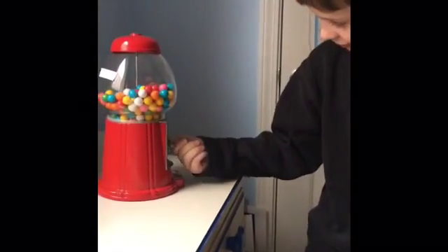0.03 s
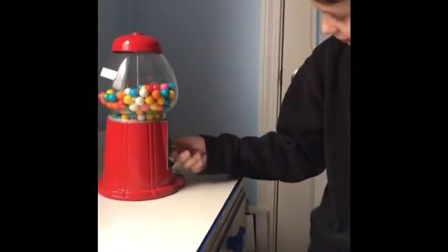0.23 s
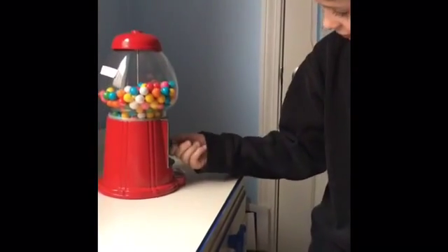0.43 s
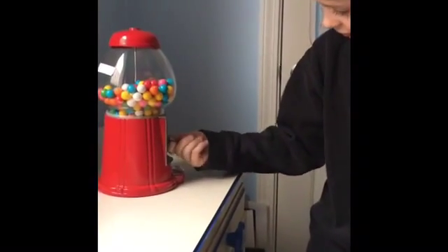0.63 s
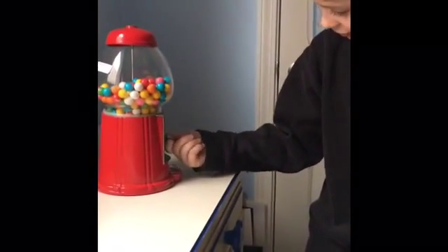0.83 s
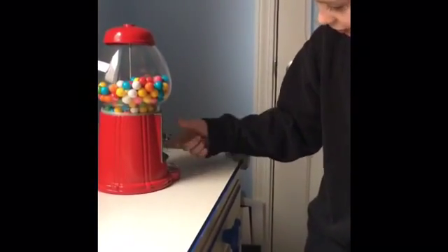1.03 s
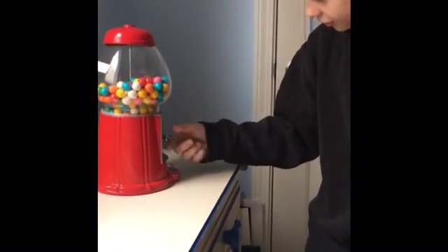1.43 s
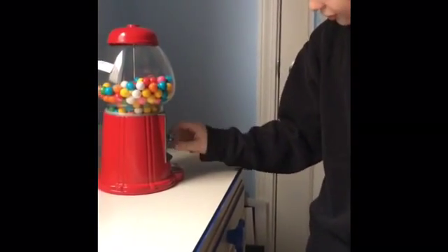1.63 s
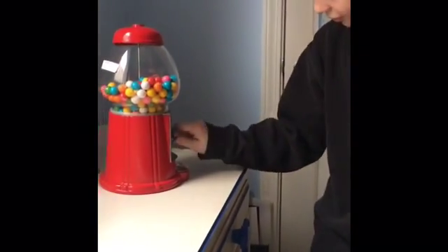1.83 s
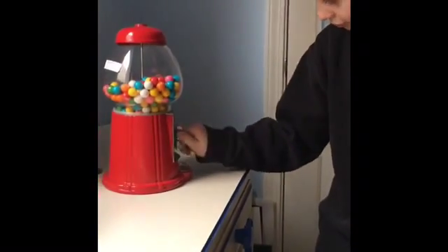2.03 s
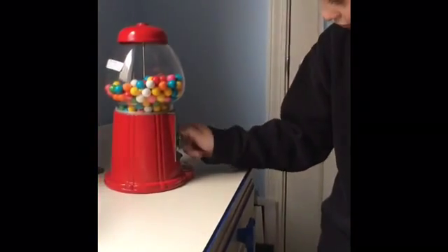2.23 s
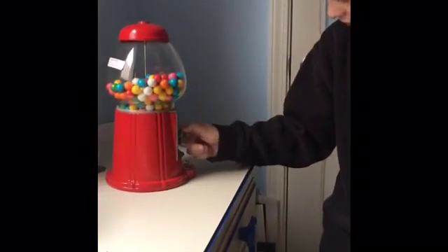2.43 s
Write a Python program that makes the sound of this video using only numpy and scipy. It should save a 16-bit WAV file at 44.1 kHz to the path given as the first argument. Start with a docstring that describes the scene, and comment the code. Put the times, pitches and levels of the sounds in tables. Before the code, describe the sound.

A gumball machine's metal crank clunks and snaps, with a coin wobbling inside between turns.

```python
"""The metal crank of a gumball machine, worked by hand on a desk in a small, quiet room.
The mechanism scrapes, clunks and snaps, each contact a noise crack that rings a part's modes.
Something round, probably a coin, wobbles ever faster on its rim in the hollow base and settles.
The crank snaps again and loose metal parts clatter to rest. The desk thuds under hard hits."""
import sys
import numpy as np
from scipy import signal
from scipy.fft import rfft, irfft, next_fast_len
from scipy.io import wavfile
from scipy.ndimage import uniform_filter1d

SR = 44100
rng = np.random.default_rng(int(sys.argv[2]) if len(sys.argv) > 2 else 0)


def materialize(psi):
    """Save the field psi as 16-bit PCM at rate SR to the path in sys.argv[1].

    A 1-D psi becomes a single channel; in a 2-D psi each row is a channel.
    """
    bounded = np.clip(np.atleast_2d(psi).T, -1, 1)
    quanta = np.round(bounded * 32767).astype(np.int16)
    wavfile.write(sys.argv[1], SR, quanta)


N = 114660
TIME = np.arange(N) / SR
DAMPING_HZ = 25  # extra mode width while parts touch


def from_db(db):
    """Decibels to gain."""
    return 10 ** (np.asarray(db) / 20)


def rms_one(x):
    """Scale to unit rms."""
    return x / np.sqrt(np.mean(x ** 2) + 1e-20)


def in_time(rows):
    """Each column of a time curve at every sample."""
    time_s, *columns = np.transpose(rows)
    return [np.interp(TIME, time_s, column) for column in columns]


def at_hz(points, hz):
    """Read a table on a log-frequency axis."""
    freq_hz, value = np.transpose(points)
    return np.interp(np.log(hz + 1e-9), np.log(freq_hz), value)


def coloured(x, points):
    """Minimum-phase filter through (freq_hz, gain_db) points."""
    size = 2 * next_fast_len(len(x))
    gain = from_db(at_hz(points, np.fft.rfftfreq(size, 1 / SR)))
    cepstrum = irfft(np.log(gain))
    cepstrum[1:size // 2] *= 2
    cepstrum[size // 2 + 1:] = 0
    return irfft(rfft(x, size) * np.exp(rfft(cepstrum)))[:len(x)]


def evened(x, width_hz):
    """Flatten a noise burst's smoothed spectrum so it has no pitch."""
    power = np.abs(rfft(x)) ** 2
    smooth = uniform_filter1d(power, max(int(width_hz * len(x) / SR), 1))
    hz = np.fft.rfftfreq(len(x), 1 / SR)
    gain_db = -10 * np.log10(smooth / power.mean() + .02)
    return coloured(x, np.column_stack([hz, gain_db])[1:])


def resonate(x, modes):
    """Parallel two-pole resonators."""
    out = 0
    for pitch_hz, width_hz, level_db in modes:
        radius = np.exp(-np.pi * width_hz / SR)
        forward = np.array([1, 0, -1]) * (1 - radius ** 2) / 2
        feedback = [1, -2 * radius * np.cos(2 * np.pi * pitch_hz / SR), radius ** 2]
        out = out + from_db(level_db) * signal.lfilter(forward, feedback, x + 1e-18)
    return out


def add(out, start_s, sound):
    """Mix a sound in at start_s."""
    start = int(start_s * SR)
    out[start:start + len(sound)] += sound[:N - start]


# Low, mid, high and top bands of a contact: edge_hz
BAND_EDGES_HZ = [300, 1500, 4500, 8000, 16000]

def balanced(hit, target_db):
    """Filter a hit toward four band levels, energy referred to 10 ms."""
    edges = np.array(BAND_EDGES_HZ)
    hz = np.fft.rfftfreq(len(hit), 1 / SR)
    power = 2 * np.abs(rfft(hit)) ** 2 / len(hit) / (SR * .01)
    band_power = [power[(hz >= low) & (hz < high)].sum() for low, high in zip(edges, edges[1:])]
    centres_hz = np.sqrt(edges[:-1] * edges[1:])
    return coloured(hit, np.column_stack([centres_hz, target_db - 10 * np.log10(band_power)]))


def contacts(rows, modes, colour, ring_db, attack_s, hold_s,
             spread_db=1.5, focus_db=8.5, focus_octaves=.25):
    """Each contact is a crack that rings the part's modes; hardness sets the band balance."""
    out, t = np.zeros(N), TIME[:SR // 5]
    for start_s, level_db, low_db, mid_db, high_db, top_db, t60_s, *spot in rows:
        envelope = np.minimum(t / attack_s, 1) * from_db(-60 * np.maximum(t - hold_s, 0) / t60_s)
        crack = evened(rng.standard_normal(len(t)) * envelope, width_hz=130)
        struck = np.array([(hz, width_hz + DAMPING_HZ, db + rng.normal(0, spread_db))
                           for hz, width_hz, db in modes])
        if spot:  # the spot struck favours modes near focus_hz
            focus_hz, cutoff_hz = spot
            octaves = np.log2(struck[:, 0] / focus_hz)
            struck[:, 2] += focus_db * np.exp(-(octaves / focus_octaves) ** 2)
            crack = signal.sosfilt(signal.butter(4, cutoff_hz, fs=SR, output="sos"), crack)
        ring = from_db(ring_db) * rms_one(resonate(crack, struck))
        hit = rms_one(coloured(crack, colour)) + ring
        add(out, start_s, balanced(hit, level_db + np.array([low_db, mid_db, high_db, top_db])))
    return out


# Room noise spectrum: freq_hz, gain_db
HUSH_COLOUR = [(20, -28.5), (50, -2), (80, -1), (130, -7), (300, -10), (700, -18), (2000, -26), (6000, -36),
               (15000, -34.5)]

def hush(level_db=-63):
    """Steady, bass-heavy room noise."""
    return from_db(level_db) * rms_one(coloured(rng.standard_normal(N), HUSH_COLOUR))


# Reverb decay: freq_hz, t60_s
ROOM_DECAY = [(200, .5), (700, 0.74), (2500, 0.206), (6500, 0.4631), (13000, 0.16)]
# Reverb spectrum: freq_hz, gain_db
TAIL_COLOUR = [(200, -9), (480, -6), (750, -1.5), (2500, 0.5), (6500, -5), (13000, -6.5)]

def room(x, onset_s=0.0042):
    """Diffuse tail; the top treble dies first."""
    t, tail = TIME[:SR * 3 // 4], 0
    edges_hz = np.geomspace(70, 17000, 12)
    for low, high in zip(edges_hz, edges_hz[1:]):
        bandpass = signal.butter(2, [low, high], "band", fs=SR, output="sos")
        band = signal.sosfilt(bandpass, rng.standard_normal(len(t)))
        t60_s = at_hz(ROOM_DECAY, np.sqrt(low * high))
        tail = tail + band * from_db(-60 * t / t60_s)
    tail *= np.clip(t / onset_s - 1, 0, 1)
    tail /= np.sqrt(np.sum(tail ** 2))
    return signal.fftconvolve(x, coloured(tail, TAIL_COLOUR))[:N]


def hollow_base(x, t60_s=0.087):
    """Short, dense reflections inside the base."""
    t = TIME[:SR // 4]
    echoes = evened(rng.standard_normal(len(t)) * from_db(-60 * t / t60_s), width_hz=80)
    return signal.fftconvolve(x, echoes / np.sqrt(np.sum(echoes ** 2)))[:N]


# Desk modes: pitch_hz, level_db, t60_s
DESK_MODES = [(61.3, -7.5, .3), (84.2, 0, 0.18), (125.7, -5, 0.33), (199, -4, 0.067)]
# Thuds: start_s, level_db
DESK_THUDS = [(0.488, -48.5), (1.996, -42.5), (2.136, -52)]
# Rumble envelope: time_s, level_db
DESK_RUMBLE = [(0, -84), (0.1, -80), (0.16, -54.5), (0.35, -59), (0.9, -69.5), (1.1, -79), (1.28, -60.5),
               (1.42, -66.5), (1.57, -53.5), (1.72, -58.5), (1.95, -71.5), (2.2, -67), (2.3, -58),
               (2.48, -63), (2.6, -61.5)]
# Rumble spectrum: freq_hz, gain_db
DESK_COLOUR = [(60, -14.5), (120, -5.5), (165, -0.5), (205, 4.5), (270, -8.5), (350, -7.5), (600, -36.5),
               (2000, -70)]

def desk():
    """The desk thuds under the hardest hits and rumbles faintly."""
    thuds = np.zeros(N)
    thud = sum(from_db(level_db - 60 * TIME / t60_s) * np.sin(2 * np.pi * pitch_hz * TIME)
               for pitch_hz, level_db, t60_s in DESK_MODES)
    for start_s, level_db in DESK_THUDS:
        add(thuds, start_s, from_db(level_db) * thud)
    rumble_db, = in_time(DESK_RUMBLE)
    return thuds + from_db(rumble_db) * rms_one(coloured(rng.standard_normal(N), DESK_COLOUR))


def grains(per_s, spread_db):
    """Tiny random clicks of uneven size."""
    sizes = from_db(spread_db * np.minimum(rng.exponential(1, N), 4)) * rng.choice([-1, 1], N)
    return rms_one(sizes * (rng.random(N) < per_s / SR))


def wander(step_s=.03, spread_db=5):
    """A mode's gain drifts as the contact point moves."""
    times_s = np.arange(0, N / SR + .1, step_s)
    return from_db(np.interp(TIME, times_s, rng.normal(0, spread_db, len(times_s))))


# Wobble speed: time_s, swings_per_s
SWING_RATE = [(0.56, 12.7), (0.83, 12.84), (1.05, 15.0), (1.3, 16.2), (1.5, 19.6), (1.62, 24.3),
              (1.72, 25.3)]
# Rim on the base: time_s, roll_db, chatter_db, swing_depth_db
RIM_LEVELS = [(0.48, -89, -91.5, 6), (0.5, -27, -70, 19), (0.56, -34, -87, 12.5), (0.9, -33, -53, 12),
              (1.05, -30.5, -55, 14), (1.4, -33, -41, 9.5), (1.54, -35, -41.5, 7.5),
              (1.66, -32.5, -34.5, 8), (1.72, -38, -37, -3), (1.74, -76.5, -88, 7.5)]
# Base modes: pitch_hz, width_hz, level_db
BASE_MODES = [(744, 49, -4), (1750, 39, -1.5), (2063, 39, 1), (2270, 22, 2.5), (2587, 49, 7), (3295, 82, 4),
              (4000, 100, -1.5), (4715, 65, -5.5), (5360, 100, -10.5), (5980, 99, -0.5), (8180, 53, -10.5)]
# Roll and slap spectrum: freq_hz, gain_db
RIM_COLOUR = [(180, -55), (300, -22.5), (470, -19), (620, -7.5), (760, -7), (850, -10.5), (1190, -11.5),
              (1450, -2), (3380, 0.5), (5530, -8.5), (6500, -11), (9180, -32), (15000, -52.5)]
# Chatter spectrum: freq_hz, gain_db
CHATTER_COLOUR = [(300, -19), (1000, -30.5), (3000, 4.5), (7000, 6), (10000, -6), (15000, -13)]
# Rim slaps: start_s, relative_db
RIM_SLAPS = [(1.012, -21.5), (1.076, -22), (1.139, -24), (1.218, -22), (1.273, -26), (1.327, -25.5),
             (1.338, -21.5), (1.388, -18.5), (1.44, -21), (1.542, -24.5), (1.584, -22.5), (1.676, -22),
             (1.693, -23), (1.701, -13), (1.713, -15)]

def coin(first_swing_s=0.563, lean_rad=0.39, slap_bands_db=(-26.5, -10, -11.5, -22), slap_t60_s=0.021):
    """The rim rolls, swelling on each swing; as the coin sinks it chatters, then slaps flat."""
    swings_per_s, = in_time(SWING_RATE)
    turns = np.cumsum(swings_per_s) / SR
    angle = 2 * np.pi * (turns - np.interp(first_swing_s, TIME, turns))
    leaned = angle + lean_rad * np.cos(angle)  # uneven rise and fall
    dip = np.abs(np.sin(leaned / 2)) ** 1.31
    roll_db, chatter_db, depth_db = in_time(RIM_LEVELS)
    rim = grains(per_s=5000, spread_db=2.5) * from_db(roll_db - depth_db * dip)
    ring = sum(resonate(rim * wander(), [(hz, width_hz + DAMPING_HZ, db)])
               for hz, width_hz, db in BASE_MODES)
    roll = rms_one(rms_one(coloured(rim, RIM_COLOUR)) + from_db(-6) * rms_one(ring)) * np.std(rim)
    ticks = grains(per_s=380, spread_db=2)
    chatter = rms_one(coloured(ticks, CHATTER_COLOUR)) * from_db(chatter_db - 1.4 * depth_db * dip)
    rows = [(start_s, db, *slap_bands_db, slap_t60_s) for start_s, db in RIM_SLAPS]
    slaps = contacts(rows, BASE_MODES, RIM_COLOUR, ring_db=3, attack_s=0.0011, hold_s=0.0025)
    return roll + chatter + from_db(-7) * slaps


# Loose metal modes: pitch_hz, width_hz, level_db
METAL_MODES = [(2592, 37, 3), (3010, 62, -2.5), (3380, 120, -2), (4235, 76, -2.5), (5180, 94, 2),
               (5760, 87, 1.5), (6360, 110, -7), (6870, 80, 3), (7340, 45, -8), (9400, 130, -5),
               (10150, 190, 0.5), (11100, 200, -5.5)]
# Clack spectrum: freq_hz, gain_db
METAL_COLOUR = [(180, -51), (300, -21), (1000, -19), (1750, -14), (2250, -6), (2600, -3), (4120, -4),
                (4850, -8.5), (6730, -4.5), (8000, -5.5), (10500, -6.5), (15000, -3.5)]
# Clacks: start_s, level_db, low_db, mid_db, high_db, top_db, t60_s, focus_hz, cutoff_hz
METAL_HITS = [(2.1065, -7, -39.5, -10.5, -18.5, -19, 0.031, 3160, 10600),
              (2.136, -3.5, -36, -19, -11.5, -18, 0.016, 6630, 15600),
              (2.163, -15.5, -29, -11.5, -8, -28, 0.032, 3970, 12000),
              (2.235, -7, -41.5, -23.5, -19.5, -15, 0.021, 10700, 12000),
              (2.2705, -13, -35, -14, -18.5, -19.5, 0.026, 5350, 12400),
              (2.2975, -15.5, -34.5, -16, -11.5, -19.5, 0.058, 7600, 14500),
              (2.3265, -16.5, -41, -9.5, -16.5, -22, 0.021, 4180, 12500),
              (2.36, -20, -36, -11, -17.5, -35, 0.026, 3270, 10900),
              (2.382, -28.5, -35, -7.5, -18.5, -33, 0.038, 4100, 11000),
              (2.472, -31, -25, -12, -17.5, -31, 0.025, 2500, 12000),
              (2.486, -33.5, -29, -9.5, -27, -35.5, 0.071, 2540, 9000)]

def metal_clacks():
    """Loose parts clatter to rest, landing on a different spot each time."""
    return contacts(METAL_HITS, METAL_MODES, METAL_COLOUR, ring_db=-2.5, attack_s=0.00083, hold_s=0.004)


# Scrape envelope: time_s, level_db
SCRAPE_LEVELS = [(0, -49.5), (0.08, -60), (0.18, -61), (1.96, -74), (1.98, -52.5), (2.36, -50), (2.45, -65),
                 (2.6, -79)]
# Scrape spectrum: freq_hz, gain_db
GRIT_COLOUR = [(300, -21.5), (1000, -10), (2000, -5), (2900, 0), (4500, -3.5), (7000, -3.5), (9000, -12),
               (15000, -25)]

def crank_scrape():
    """Faint gritty friction of the turning crank rings the loose metal."""
    level_db, = in_time(SCRAPE_LEVELS)
    grit = grains(per_s=7000, spread_db=2.5)
    ring = from_db(-9.5) * rms_one(resonate(grit, METAL_MODES))
    return from_db(level_db) * rms_one(rms_one(coloured(grit, GRIT_COLOUR)) + ring)


# Housing modes: pitch_hz, width_hz, level_db
HOUSING_MODES = [(247, 20, -3), (363, 14, -8), (527.6, 24, 10), (614, 69, 3), (710, 8, -3.5), (896, 26, 1),
                 (1254, 44, 1.5), (1405, 35, 10.5), (1775, 63, 4.5), (2150, 37, 0.5), (2540, 71, -1),
                 (3220, 70, 7), (4160, 43, -3.5), (5170, 150, 1)]
# Clunk spectrum: freq_hz, gain_db
HOUSING_COLOUR = [(59, -59.5), (130, -25), (230, -8), (420, -14), (540, 3.5), (760, -5), (1100, -7),
                  (1400, -2), (2500, -5.5), (3800, -11), (7500, -14.5), (15000, -24.5)]
# Clunks: start_s, level_db, low_db, mid_db, high_db, top_db, t60_s
HOUSING_HITS = [(0.231, 0.5, -18, -15, -16.5, -18.5, 0.077), (0.267, -11, -15.5, -13, -21, -18.5, 0.057)]

def housing_clunks():
    """The mechanism knocks twice and rings the housing."""
    return contacts(HOUSING_HITS, HOUSING_MODES, HOUSING_COLOUR,
                    ring_db=-2, attack_s=0.00026, hold_s=0.0036)


# Ratchet modes: pitch_hz, width_hz, level_db
RATCHET_MODES = [(512, 69, -7), (1380, 45, -3), (2042, 58, -5.5), (3030, 68, -1), (4320, 70, -1.5),
                 (4900, 63, -4), (5870, 89, 4), (7260, 110, -4), (9520, 72, -5), (10100, 120, 3.5),
                 (13660, 130, 7)]
# Snap spectrum: freq_hz, gain_db
RATCHET_COLOUR = [(59, -44), (100, -21.5), (733, -14.5), (1000, -7), (1560, -7), (2000, -9), (4540, -13),
                  (6200, 1), (8200, -2.5), (15000, -5.5)]
# Snaps: start_s, relative_db, low_db, mid_db, high_db, top_db, t60_s
RATCHET_HITS = [(0.103, -27, -40, -19.5, -8, -19.5, 0.046), (0.397, -40, -28.5, -3.5, -7, -22.5, .05),
                (0.487, -1.5, -36.5, -19, -12.5, -11.5, 0.024), (1.889, -48.5, -14, -12, -17, -14, .03),
                (1.973, -15.5, -27.5, -31, -16, -16.5, 0.043), (1.992, -0.5, -26, -21, -13, -11.5, 0.033)]

def ratchet_snaps():
    """The crank's ratchet snaps with a short, bright ring."""
    return contacts(RATCHET_HITS, RATCHET_MODES, RATCHET_COLOUR, ring_db=-2, attack_s=.002, hold_s=0.0031)


def scene():
    """Direct sound plus base and room reflections, over the hush; mono."""
    clunks = housing_clunks()
    snaps = from_db(-2.5) * ratchet_snaps()
    clacks = metal_clacks()
    wobble = coin()
    inside = hollow_base(from_db(-4.5) * wobble + from_db(-11.5) * (clacks + snaps))
    reverb = room(from_db(-10) * clunks + from_db(-9.5) * snaps
                  + from_db(-11) * clacks + from_db(-14) * wobble)
    return (hush() + clunks + snaps + clacks + wobble + crank_scrape() + desk() + inside + reverb)[None]


def record(dry, low_cut_hz=45, high_cut_hz=15300):
    """Microphone: bass cut, soft clip, steep top cut."""
    thin = signal.sosfilt(signal.butter(2, low_cut_hz, "high", fs=SR, output="sos"), dry)
    rounded = np.tanh(thin)
    return signal.sosfilt(signal.ellip(10, .2, 80, high_cut_hz, fs=SR, output="sos"), rounded)


dry = scene()
out = record(dry)
materialize(out)
```